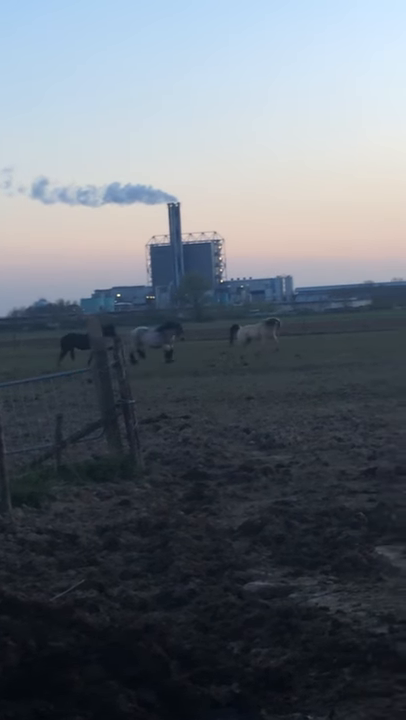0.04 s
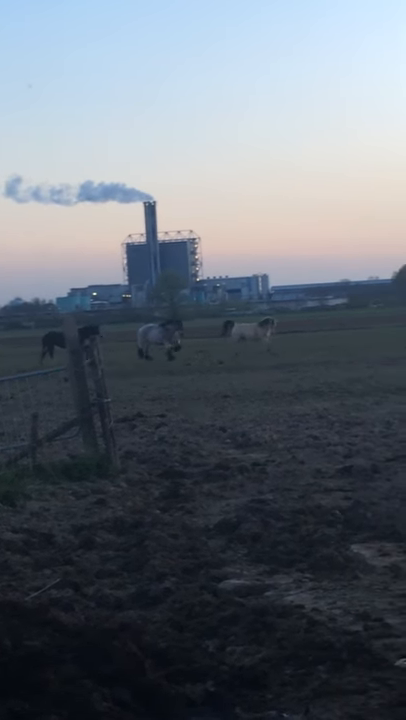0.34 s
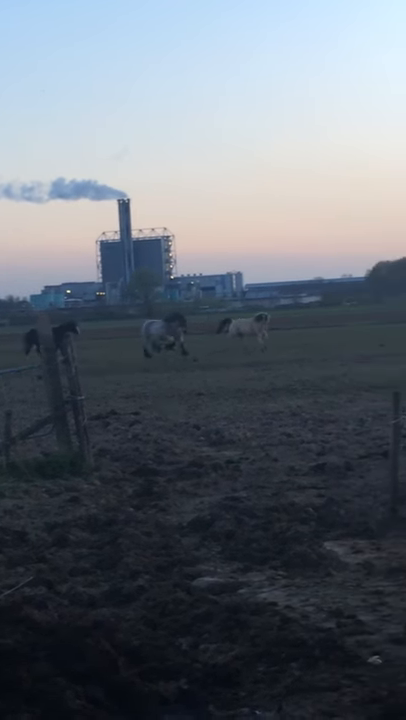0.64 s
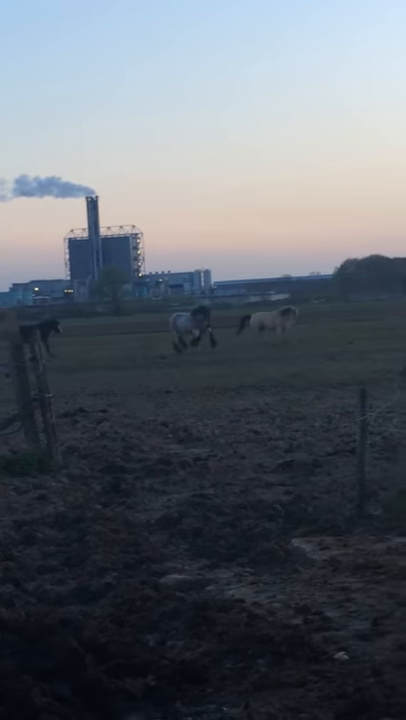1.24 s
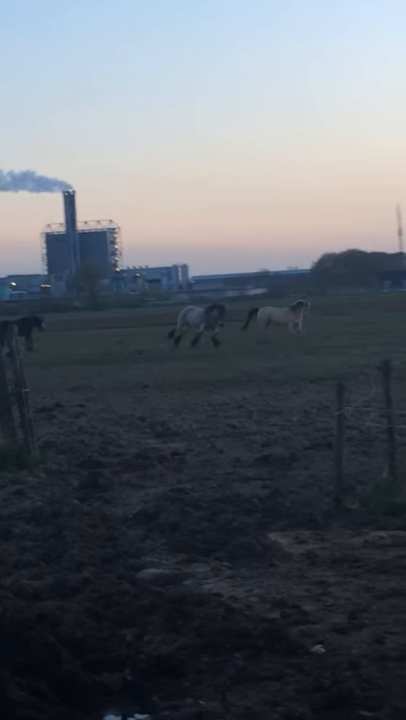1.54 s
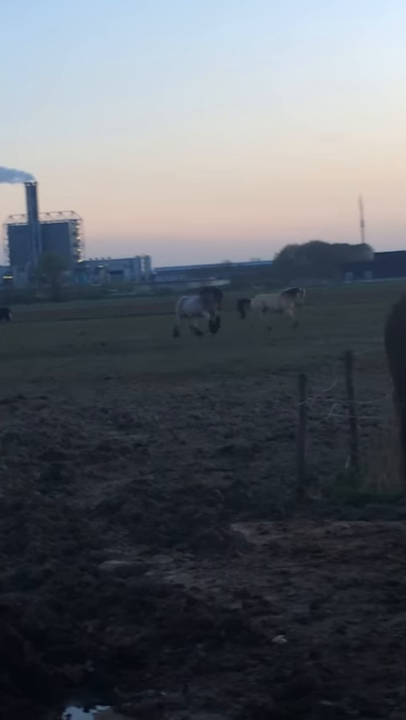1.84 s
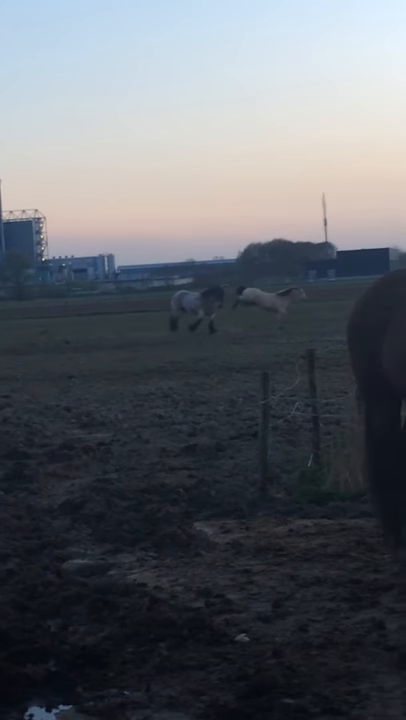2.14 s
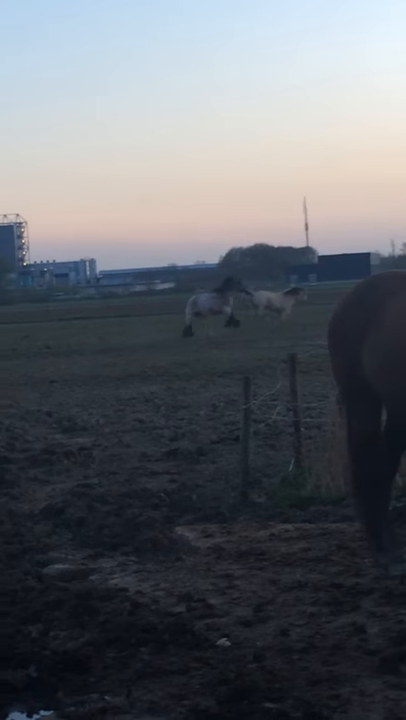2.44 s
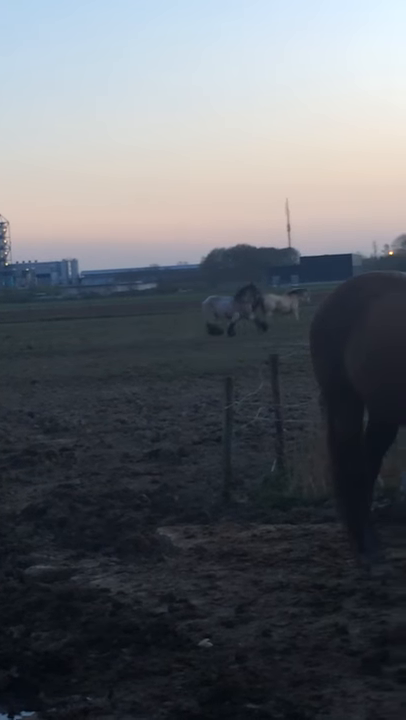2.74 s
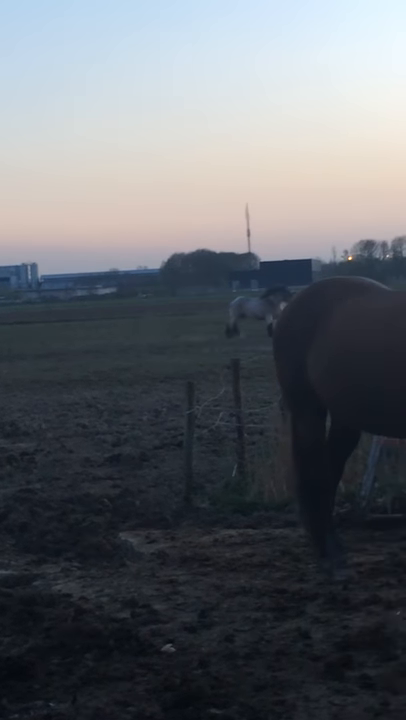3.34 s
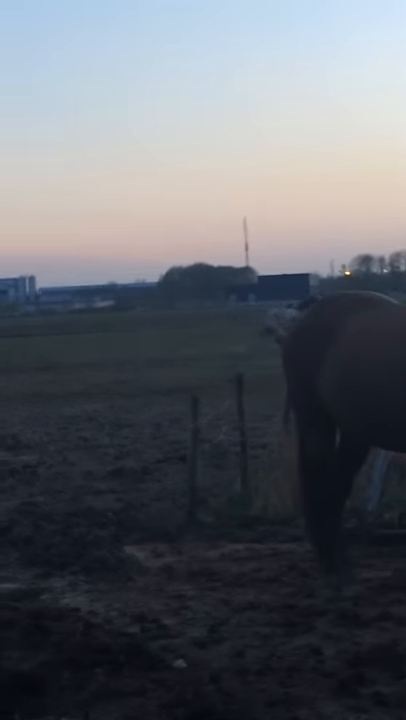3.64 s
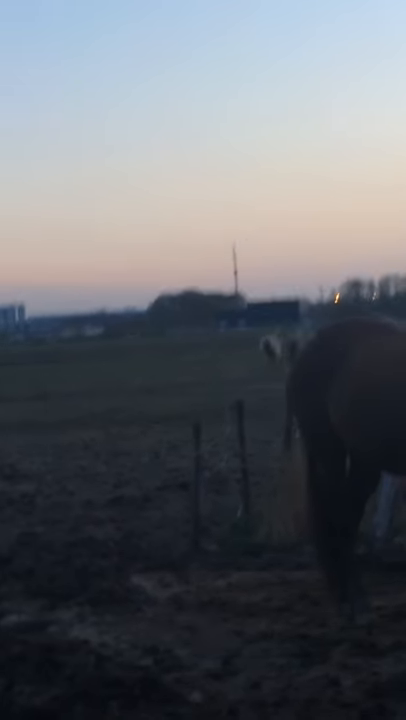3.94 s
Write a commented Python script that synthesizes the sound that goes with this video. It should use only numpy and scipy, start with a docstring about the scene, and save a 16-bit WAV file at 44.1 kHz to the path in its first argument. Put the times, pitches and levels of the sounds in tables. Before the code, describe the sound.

A horse squeals in an open pasture, high, rough and wavering, from about 2.2 to 2.9 seconds, then briefly again from 3.0 to 3.3. Before that, wind bumps the microphone during the first half second. Dull hoof thuds and small soil crunches come irregularly from about 1.6 to 3.8 seconds, strongest near 3.4. A low wind rumble, faint hiss and distant industrial hum continue throughout.

```python
"""Two horses scuffle far out on a pasture at dusk, and one squeals twice: a high, wavering whistle of the larynx,
roughened by a second, slower vibration and by rushing air. Hooves thud and crunch on the soil nearer by.
Wind bumps the microphone over a low rumble and the hum of a distant plant."""
import sys
import numpy as np
from scipy import signal
from scipy.fft import rfft, irfft
from scipy.io import wavfile
from scipy.ndimage import uniform_filter1d

SR = 44100
rng = np.random.default_rng(int(sys.argv[2]) if len(sys.argv) > 2 else 0)


def file_out(sig):
    """Save sig as 16-bit WAV at sys.argv[1]."""
    # one column per channel
    cols = np.atleast_2d(sig).T
    # limit, then scale
    lim = np.clip(cols, -1, 1)
    pcm = np.round(lim * 32767).astype(np.int16)
    wavfile.write(sys.argv[1], SR, pcm)


N = 176400

# pitch of the long and of the short squeal: (s, Hz)
LONG_PITCH = [(2.16, 921.9), (2.182, 1071), (2.306, 1808), (2.326, 1910), (2.392, 1747), (2.46, 2103), (2.51, 1502),
              (2.58, 1691), (2.6, 1590), (2.62, 1182), (2.638, 1054), (2.658, 1127), (2.692, 1450), (2.72, 1582),
              (2.762, 1262), (2.83, 1577), (2.852, 1470), (2.88, 1013), (2.9, 1020)]
SHORT_PITCH = [(3.0,900),(3.04,1200),(3.075,1570),(3.115,1770),(3.15,1740),(3.21,1450),(3.245,1330),(3.285,950)]
# their loudness: (s, dB)
LONG_LEVEL = [(2.15, -68), (2.16, -71), (2.218, -49.5), (2.25, -51.5), (2.314, -38), (2.4, -44.5), (2.414, -39.5),
              (2.476, -38), (2.492, -48.5), (2.538, -56), (2.59, -43), (2.648, -58), (2.67, -52), (2.862, -55.5),
              (2.91, -76)]
SHORT_LEVEL = [(3.01,-69),(3.04,-54.5),(3.08,-48.5),(3.095,-52),(3.115,-42),(3.132,-44),(3.148,-56),(3.19,-58.5),(3.215,-54),(3.25,-53.5),(3.285,-65)]
# their roughness: (s, second vibration dB, rushing air dB, overtones dB), against the clean whistle
LONG_ROUGH = [(2.18,-22,-23,6),(2.235,-10,-13,-3.5),(2.285,1.5,-10.5,0.5),(2.325,-10,-5,-1),(2.375,-17,-13.5,6.5),(2.44,-9.5,-8,-6.5),(2.48,-13,-7,-9.5),(2.52,-19,-7.5,-16),(2.58,-27,-19,-19.5),(2.655,-16,-15,1),(2.71,-8,-5.5,-4.5),(2.77,-18,-7,-1.5),(2.87,-31,-16,-4)]
SHORT_ROUGH = [(3.02,-11,-13,8),(3.08,-19,-5,1.5),(3.127,10,-18,-5),(3.16,-3,8,-18),(3.2,-4,10,-1),(3.245,-29,-12,0.5)]
# the second vibration: (s, Hz)
SECOND_PITCH = [(2.25,636.4),(2.32,637),(2.39,580.4),(2.45,639),(2.72,617.4),(3.11,578),(3.14,616)]
LOWER_SIDEBAND_DB, SECOND_JITTER = -24, 0.0265
JITTER, JITTER_PER_S, SHIMMER_DB = 0.0081, 144, 4.5
OVERTONE_DB = -1   # for each step up the harmonics
# resonances of throat and mouth: (Hz, dB)
THROAT = [(500,-30),(800,-14),(1030,11.5),(1300,0),(1620,-3.5),(1980,4.5),(2200,2.5),(2500,8.5),(2850,-9),(3250,1.5),(3650,-3.5),(4050,-13),(4700,-17.5),(5400,-17.5),(6200,-19.5),(7200,-28.5),(8100,-39),(9300,-32.5),(11000,-45),(15000,-46)]
# colour of the rushing air: (Hz, dB per Hz)
AIR = [(400,-30),(750,-22),(1030,0),(1300,-34),(1700,-10),(2030,7),(2200,-1.5),(2480,8),(2820,-33),(3200,-7),(3900,-9),(4700,-13.5),(6200,-14),(8100,-33),(9400,-21),(11000,-37),(15000,-42)]
SQUEAL_DB = 0.0
# dull echoes off the field: (delay s, dB)
ECHOES = [(0.044,-19.5),(.09,-41),(.16,-39)]
ECHO_CUT_HZ = 2300
# wind bumps on the microphone: (s, peak dB, Hz)
BUMPS = [(.007,-33,113),(0.037,-48.5,185),(0.153,-44,85),(0.176,-36,107),(0.224,-32,84),(.259,-32,106),(.285,-24,93.5),(0.352,-29.5,116)]
# hoof thuds: (s, ground swing dB, its Hz, knock dB)
THUDS = [(1.567,-39,163,-63),(1.594,-40.5,192,-62),(2.225,-42.5,200,-44),(2.53,-33,196.5,-36.5),(2.895,-38.5,92,-55),(2.925,-34.5,140.6,-39.5),(3,-43,131.2,-30.5),(3.007,-39.5,168.6,-66),(3.157,-35,162,-47),(3.164,-35,183,-39),(3.178,-32,147,-40),(3.199,-45,180,-42),(3.352,-37.5,101,-64),(3.426,-38,113,-57),(3.437,-28,149,-25.5),(3.515,-39,77.4,-52),(3.683,-48,111,-63)]
THUD_CYCLES, THUD_CUT_HZ, THUD_ATTACK_S = 6.6, 446, 0.00099
# soil and straw crunch: (s, peak dB, length s)
CRUNCHES = [(0.855,-50,0.0067),(1.566,-54,0.029),(1.594,-62.5,0.014),(1.678,-45,.009),(1.683,-53,.008),(1.978,-51,0.015),(2.042,-49,0.0086),(2.233,-43,0.0042),(2.581,-42.5,.006),(2.92,-48,0.0086),(3,-50.5,0.017),(3.368,-48.5,0.0094),(3.44,-45,0.0046),(3.547,-48,.006),(3.623,-47,0.0058),(3.639,-63,.012),(3.806,-55.5,.025)]
CRUNCH = [(400,5),(800,8),(1600,9),(2600,2),(4200,-2),(6500,-9.5),(9000,-18),(15000,-27.5)]   # (Hz, dB per Hz)
CRUNCH_DB, GRAIN_DB = -5, 4
# far background: (Hz, dB per Hz)
FAR = [(300,-1.5),(500,-7),(700,-3.5),(930,-2.5),(1200,-8.5),(1730,-12.5),(2400,-17),(2900,-23),(5000,-28),(8000,-31.5),(15000,-37.5)]
FAR_LEVEL = [(0,-64),(.55,-64.5),(.85,-64),(1.2,-64.5),(1.7,-64.5),(2.8,-62),(3.55,-61.5),(4,-61)]   # (s, dB)
FAR_DB = 1.5
# wind rumble: (Hz, dB per Hz) and (s, dB)
RUMBLE = [(20,-11.5),(35,-12),(48,3.5),(100,-0.5),(150,-1),(220,-5.5),(350,-15.5),(480,-21),(900,-48.5)]
RUMBLE_LEVEL = [(0,-53.5),(.4,-54),(.55,-57),(.75,-51.5),(.95,-52),(1.2,-52),(1.5,-51.5),(1.95,-54.5),(2.25,-50.5),(2.75,-55.5),(3.1,-52),(3.55,-52),(3.75,-55),(4,-58)]
GUST_DB = 1.86
HUM_HZ, HUM_WIDTH_HZ, HUM_DB = 78.7, 8.4, -55.5
CUTOFF_HZ = 15300   # fixed
T = np.arange(N) / SR
JITTER_GROWTH = 0.45   # the pitch is less steady as more air rushes
KNOCK_HZ, KNOCK_CYCLES = 283, 6.8
RASP_HZ, RASP_JITTER, RASP_DB = 209.6, 0.188, -4.5   # a fast flutter, as strong as the rushing air plus this
THUD_LOW_CUT_HZ = 43
# a soft band of far-off tyre noise swells and fades: (Hz, dB per Hz) and (s, dB)
TYRES = [(500,-30),(780,-6.5),(930,-1),(1080,-2.5),(1500,-37.5)]
TYRES_LEVEL = [(.4,-75.5),(.85,-64),(1.25,-77),(1.7,-74),(2.1,-77.5)]


def from_db(db):
    """Decibels to gain."""
    return 10 ** (np.asarray(db) / 20)


def rms_one(x):
    """Scale to unit power."""
    return x / np.sqrt(np.mean(x ** 2) + 1e-20)


def in_time(rows):
    """Each column of a curve, sample by sample."""
    s, *columns = np.transpose(rows)
    return [np.interp(T, s, c) for c in columns]


def at_hz(points, hz):
    """Gain of a spectrum at these frequencies."""
    f, db = np.transpose(points)
    return from_db(np.interp(np.log(hz + 1e-3), np.log(f), db))


def coloured(x, spectrum):
    """Filter by a spectrum."""
    return irfft(rfft(x) * at_hz(spectrum, np.arange(N // 2 + 1) * SR / N), N)


def noise(spectrum):
    """Coloured noise of unit power."""
    return rms_one(coloured(rng.standard_normal(N), spectrum))


def cut(x, hz, kind, order=2):
    """Butterworth low- or high-pass."""
    return signal.sosfilt(signal.butter(order, hz, kind, fs=SR, output="sos"), x)


def drift(rate):
    """Slow chance with spread 1."""
    f = np.arange(N // 2 + 1) * SR / N
    return rms_one(irfft(rfft(rng.standard_normal(N)) / (1 + (f / rate) ** 2), N))


def squeal(pitch, level, rough):
    """A jittering whistle; the second vibration and the flutter put sidebands beside each harmonic; air rushes with it."""
    second_db, air_db, bright_db = in_time(rough)
    unsteady = JITTER * from_db(JITTER_GROWTH * (air_db + 9))
    hz = uniform_filter1d(in_time(pitch)[0], size=500) * (1 + unsteady * drift(JITTER_PER_S))
    second_hz = in_time(SECOND_PITCH)[0] * (1 + SECOND_JITTER * drift(JITTER_PER_S))
    rasp_hz = RASP_HZ * (1 + RASP_JITTER * drift(JITTER_PER_S))
    on = (T > level[0][0]) & (T < level[-1][0])
    partners = ((0, 0), (second_hz, second_db), (-second_hz, second_db + LOWER_SIDEBAND_DB), (rasp_hz, air_db + RASP_DB))
    voice = np.zeros(N)
    for k in range(1, 9):
        harmonic_db = bright_db * np.log2(k) + OVERTONE_DB * (k - 1) + SHIMMER_DB * drift(44)
        for offset_hz, db in partners:
            partial_hz = (k * hz + offset_hz)[on]
            voice[on] += from_db((harmonic_db + db)[on]) * at_hz(THROAT, partial_hz) * np.sin(2 * np.pi * np.cumsum(partial_hz) / SR)
    voice /= np.sqrt(np.abs(uniform_filter1d(voice ** 2, size=700)) + 1e-9)
    air = from_db(air_db) * rms_one(noise(AIR) * (1 + .5 * np.cos(2 * np.pi * np.cumsum(second_hz) / SR)))
    loudness = from_db(in_time(level)[0] + SQUEAL_DB) * uniform_filter1d(on * 1., size=400)
    return loudness * (voice + air) / np.sqrt(1 + from_db(2 * air_db))


def field(x):
    """The direct sound and a few dull echoes."""
    dull = cut(x, ECHO_CUT_HZ, "low")
    return x + sum(from_db(db) * np.interp(T - s, T, dull) for s, db in ECHOES)


def wind():
    """Gusty rumble, and single swings of pressure on the microphone."""
    out = noise(RUMBLE) * from_db(in_time(RUMBLE_LEVEL)[0] + GUST_DB * drift(8.6))
    for s, db, hz in BUMPS:
        u = (np.pi * hz * (T - s)) ** 2
        out += from_db(db) * (1 - 2 * u) * np.exp(-np.minimum(u, 50))  # fixed
    return out


def thuds():
    """Each hoof knocks and sets the soft ground swinging for a few cycles."""
    out = np.zeros(N)
    for s, swing_db, swing_hz, knock_db in THUDS:
        age = np.clip(T - s, 0, .5)
        for db, hz, cycles in ((swing_db, swing_hz, THUD_CYCLES), (knock_db, KNOCK_HZ, KNOCK_CYCLES)):
            out += from_db(db - 60 * age * hz / cycles) * (1 - np.exp(-age / THUD_ATTACK_S)) * np.sin(2 * np.pi * hz * age)
    return 2 * cut(cut(out, THUD_LOW_CUT_HZ, "high"), THUD_CUT_HZ, "low", order=6)


def crunches():
    """Short, grainy bursts as clods and straw give way."""
    force = sum(from_db(db + CRUNCH_DB) * (T >= s) * np.exp(-np.clip(T - s, 0, .5) / length) for s, db, length in CRUNCHES)
    return force * rms_one(noise(CRUNCH) * from_db(GRAIN_DB * drift(400)))


def distance():
    """Smooth far hiss, tyres and a wavering low hum."""
    hiss = rms_one(cut(noise(FAR), 354, "high")) * from_db(in_time(FAR_LEVEL)[0] + FAR_DB)
    turn = 2 * np.pi * HUM_HZ * T
    hum = rms_one((1 + 0.63 * drift(HUM_WIDTH_HZ)) * np.sin(turn) + 0.43 * drift(HUM_WIDTH_HZ) * np.cos(turn))
    return hiss + noise(TYRES) * from_db(in_time(TYRES_LEVEL)[0]) + from_db(HUM_DB) * hum


def scene():
    """The pasture, in mono."""
    horse = squeal(LONG_PITCH, LONG_LEVEL, LONG_ROUGH) + squeal(SHORT_PITCH, SHORT_LEVEL, SHORT_ROUGH)
    return (field(horse) + wind() + thuds() + crunches() + distance())[None]


def record(dry):
    """The top is cut steeply."""
    return signal.sosfilt(signal.ellip(12, .1, 70, CUTOFF_HZ, fs=SR, output="sos"), dry)  # fixed


dry = scene()
out = record(dry)
file_out(out)
```